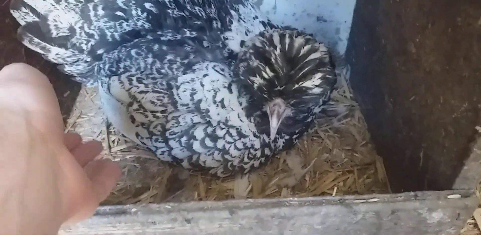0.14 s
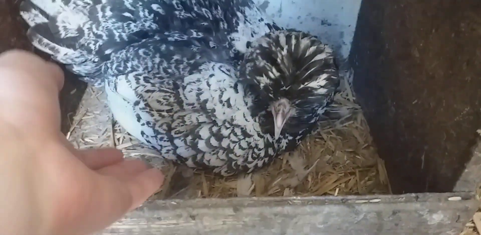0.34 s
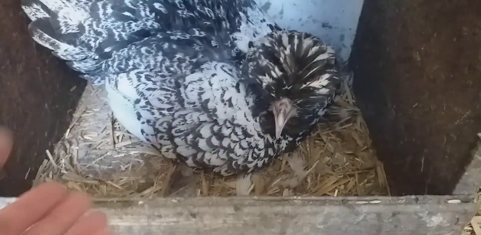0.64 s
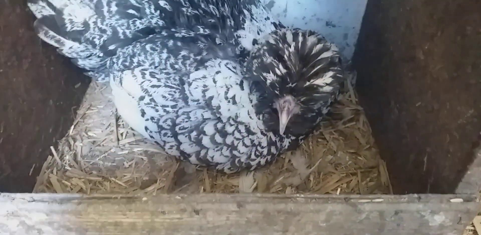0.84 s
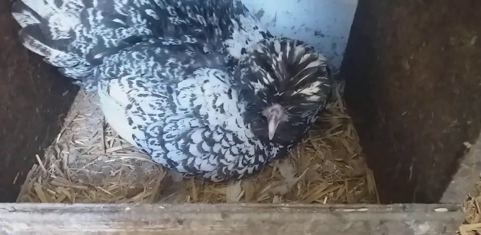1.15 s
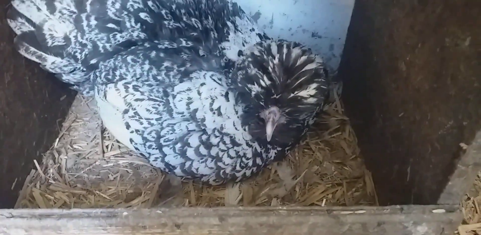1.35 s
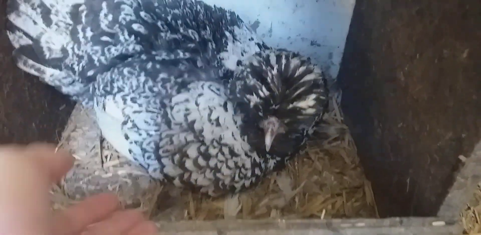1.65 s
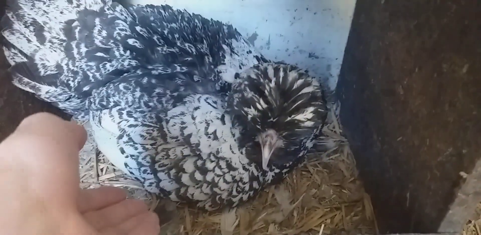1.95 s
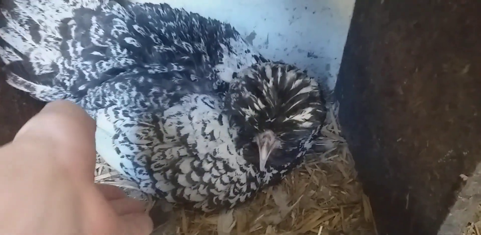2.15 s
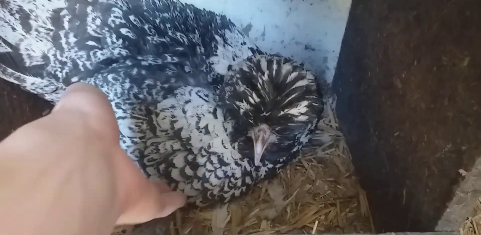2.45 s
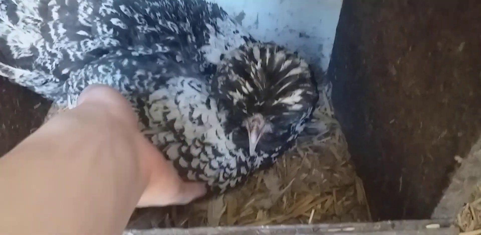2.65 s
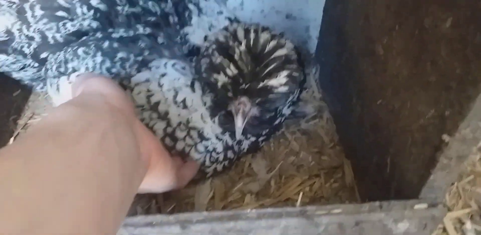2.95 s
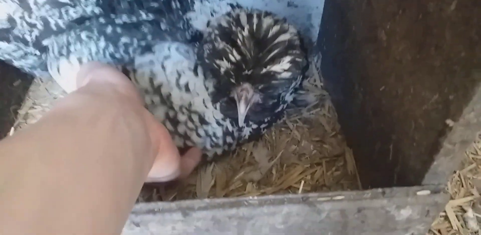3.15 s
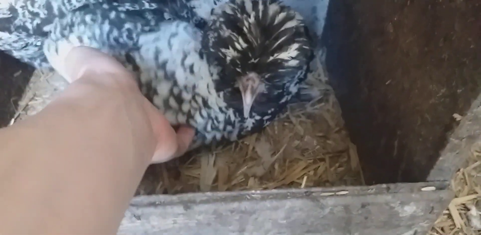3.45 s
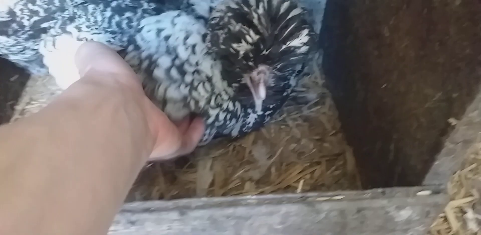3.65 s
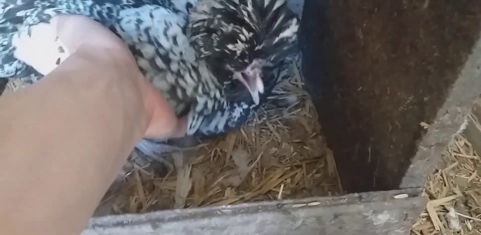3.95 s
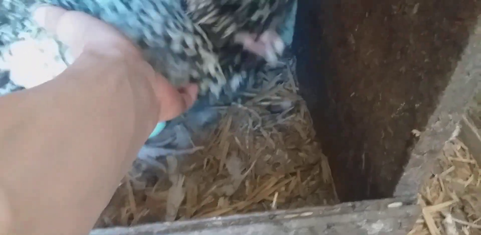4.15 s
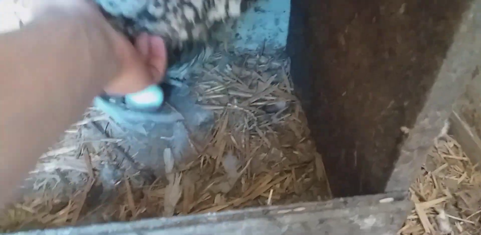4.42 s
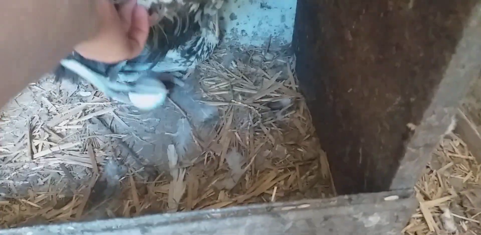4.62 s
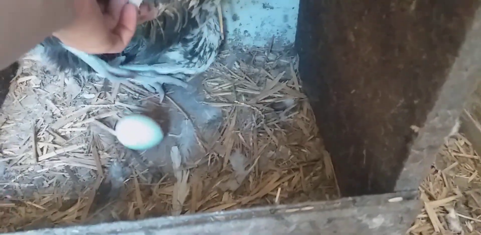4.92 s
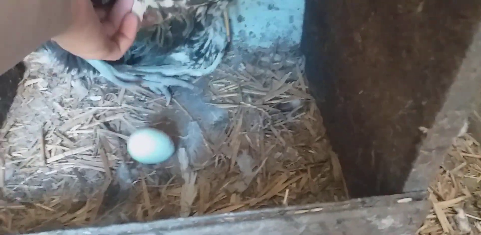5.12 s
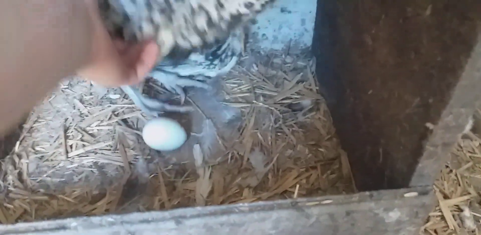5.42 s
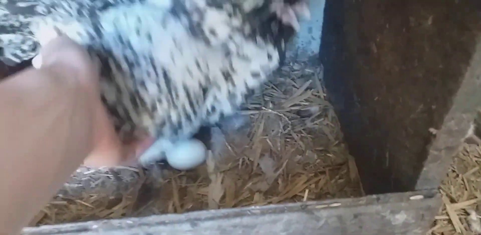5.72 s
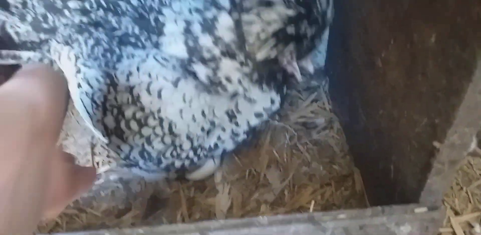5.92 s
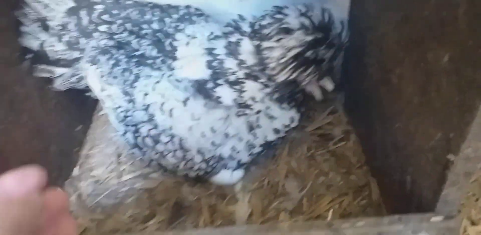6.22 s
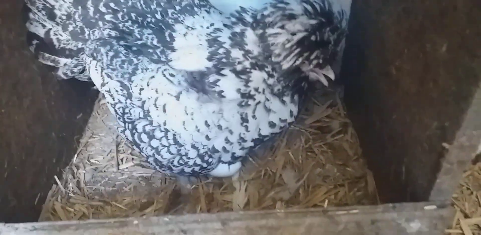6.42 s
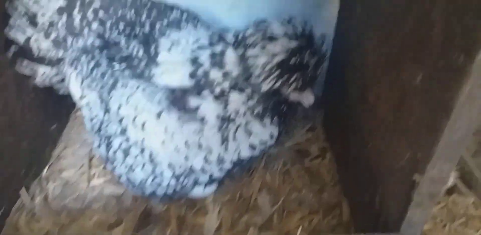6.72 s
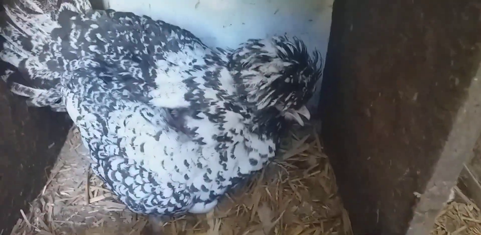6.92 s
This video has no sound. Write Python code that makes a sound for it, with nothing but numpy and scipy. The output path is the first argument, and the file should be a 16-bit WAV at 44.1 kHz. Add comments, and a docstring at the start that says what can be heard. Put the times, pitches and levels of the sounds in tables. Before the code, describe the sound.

A broody hen, an arm's length away in a wooden nest box, gives a thin rising squeal that turns raspy. After a pause she squeals again, louder and quavering, and sinks into a throbbing growl, followed by a long, softer grumble. Further off, a second hen clucks steadily and twice breaks into a two-note squawk. Faint bumps, shuffling and rustling straw lie underneath, and the coop walls echo briefly.

```python
"""Thin squeals from a broody hen, an arm's length away in a wooden nest box, sink into throbbing growls.
Membranes in her syrinx chop the breath into pulses, which the resonances of windpipe and beak filter.
Further off a second hen clucks steadily and twice breaks into a two-note squawk.
The box is bumped, a body shuffles, straw rustles, and the walls of the coop echo briefly."""
import sys
import numpy as np
from scipy import signal
from scipy.fft import rfft, irfft, next_fast_len
from scipy.io import wavfile
from scipy.ndimage import uniform_filter1d

SR = 44100
rng = np.random.default_rng(int(sys.argv[2]) if len(sys.argv) > 2 else 0)


def output_pcm(signal):
    """Save a mono or channel-first signal as 16-bit PCM at the path in sys.argv[1].

    Samples are clipped to [-1, 1] before scaling.
    """
    pcm = np.clip(np.atleast_2d(signal).T, -1, 1) * 32767
    wavfile.write(sys.argv[1], SR, np.round(pcm).astype(np.int16))


N = 312000

# The broody hen's calls, one list a bout. Each row: time in seconds, pitch in Hz, relative level in dB.
BOUTS = [
    [(.2, 1708, -32), (.35, 1883, -24), (.44, 1796, -24.5), (.51, 1563, -13.5), (.58, 1177, -18),
     (.7, 1150, -16)],
    [(1.935, 1623, -22.5), (1.965, 1773, -15), (1.99, 1640, -27), (2.13, 1640, -17.5), (2.37, 1683, -23),
     (2.47, 1630, -14), (2.64, 1630, -13), (2.71, 1300, -9.5), (2.765, 1587, -18.5), (2.87, 1572, -13.5),
     (2.95, 1251, -8.5), (3.45, 1150, -10), (3.48, 943, -15.5), (3.69, 942.3, -15.5), (3.95, 916, -18.5),
     (4.25, 907.4, -16), (4.38, 1079, -19.5), (4.452, 1142, -20.5)],
    [(4.75, 1313, -24.5), (4.805, 1242, -30), (4.82, 891.3, -22), (5.15, 901, -24), (5.35, 943, -17),
     (5.6, 886.2, -22), (6.325, 881.6, -22.5)],
    [(7.004, 882, -26), (7.018, 893, -28), (7.024, 872, -15), (7.07, 860, -52)],
]
# Her breath catches, then bursts through. Each row: time of the burst in seconds, gap depth in dB.
BREATH_CATCHES = [(2.001, 7.5), (2.14, 4.5), (2.203, 13), (2.742, 10.5), (2.777, 4), (2.981, 4),
                  (3.036, 11.5), (3.077, 9), (3.141, 13), (3.179, 5.5), (3.429, 14.5), (3.711, 13.5),
                  (3.811, 7.5), (3.934, 6), (4.365, 8.5), (4.423, 15.5), (4.882, 11.5), (4.948, 15),
                  (5.008, 11), (5.06, 6.5), (5.11, 8.5), (5.469, 10), (5.519, 11.5), (5.579, 10.5),
                  (5.649, 6.5), (5.713, 12.5), (5.779, 10), (6.086, 10), (6.248, 8), (6.302, 7)]
# Her pitch sags for an instant. Each row: time in seconds, share of pitch lost.
PITCH_SAGS = [(2.005, 0.19), (2.148, 0.24), (2.415, 0.11), (2.457, 0.2), (2.542, 0.19), (2.648, 0.3),
              (2.941, .12)]
# Her registers. Each: roughness from 0 to 1, flutter as a share of pitch, subharmonic amplitude.
WHISTLE, QUAVER, RASP = (.04, .025, 0), (.08, .11, 0), (.4, .11, .2)
SCREAM, GROWL, GRUMBLE = (.2, .006, .45), (.55, .035, .47), (.52, .03, .22)
# She slides from register to register. Each row: start in seconds, register.
PHRASES = [(0, WHISTLE), (.48, QUAVER), (.57, RASP), (1.5, WHISTLE), (1.981, QUAVER), (2.25, WHISTLE),
           (2.388, QUAVER), (2.678, RASP), (2.76, WHISTLE), (2.91, RASP), (3.481, SCREAM), (3.691, GROWL),
           (4.6, WHISTLE), (4.81, GRUMBLE)]
# Windpipe and beak resonances for each posture of her neck. Each row: start in seconds, then a list
# of modes, each with frequency in Hz, width in Hz, gain in dB.
NECK_POSTURES = [(0, [(1340, 3000, 1), (3120, 900, 14.5), (4990, 233, 7), (6480, 3500, -8)]),
                 (1.5, [(1110, 640, 1), (2780, 630, 11), (4550, 650, 8.5), (6500, 1050, -10)]),
                 (2.93, [(894, 252, 3), (1450, 180, 2), (2520, 980, 5), (4770, 570, -0.5),
                 (6130, 1140, -9.5)]), (3.482, [(940.4, 400, -11), (2430, 670, -2.5), (3530, 2600, -9.5),
                 (4960, 250, -1), (5910, 160, -1.5)]), (3.699, [(934, 464, -6.5), (1758, 403, 2),
                 (2420, 830, -3.5), (3700, 790, 2.5), (4050, 1440, -0.5), (6300, 8100, -21)]),
                 (4.32, [(1100, 420, 2), (1550, 420, 2.5), (2700, 1000, -12.5), (5200, 580, -8.5)]),
                 (4.599, [(868, 360, -6), (1871, 1004, -0.5), (2549, 890, -2), (3950, 690, -5),
                 (5760, 1900, -14.5)]), (5.56, [(960, 800, -11), (1370, 330, 3), (1584, 410, 2),
                 (3083, 200, -3), (3830, 228, -5.5), (5210, 306, -1)])]
# Yelps over the growl. Each row: time in seconds, level against the growl in dB.
YELP_LEVELS = [(2.95, -35.5), (3.05, -10.5), (3.5, -20), (4.05, -7.5), (4.2, -1.5), (4.5, 3), (5.2, -8.5),
               (6.3, -3.5)]
# The microphone's colouring of her voice. Each row: frequency in Hz, gain in dB.
MICROPHONE_RESPONSE = [(120, -21.5), (250, 5), (480, 4.5), (900, -10), (6000, -9), (8400, -20.5),
                       (10000, -25), (13000, -17.5), (15500, -20.5)]
# The second hen's clucks. Each row: start in seconds, pitch in Hz.
CLUCKS = [(-.03, 382.2), (0.186, 359), (0.389, 353), (0.588, 338), (1.147, 350.3), (1.414, 323),
          (2.46, 327.5), (2.663, 335.2), (2.87, 351.4), (3.055, 372), (3.604, 346), (3.835, 347.7),
          (5.21, 333), (5.411, 331), (5.61, 333.4), (5.8, 329.7), (6.01, 326), (6.518, 328.6)]
# Her squawks. Each row: start, loudest moment, break and end in seconds, high and low note in Hz,
# relative level in dB.
SQUAWKS = [(0.697, 0.742, .838, 1.0, 882.4, 772.6, -8.5), (3.181, 3.25, 3.32, 3.415, 991.6, 762, -8)]
# The filter of her throat. Each row: frequency in Hz, gain in dB.
FAR_THROAT = [(150, -57.5), (250, -17), (525, -15), (913, 4.5), (1100, -8), (2090, -19.5), (2950, -7.5),
              (4550, -25.5), (5600, -27), (7400, -41), (8600, -59.5), (12200, -39.5), (15500, -43.5)]
# Knocks on the box. Each row: time in seconds, peak level in dB, ringing frequency in Hz.
BUMPS = [(0.066, -34, 105), (1.586, -47, 145), (2.718, -33, 178), (6.716, -37, 151.9)]
# The body shifts on the boards. Each row: time in seconds, peak level in dB.
SHUFFLES = [(.95, -42), (2.72, -52.5), (3.6, -52), (4.1, -51.5), (4.45, -41.5), (4.87, -40.5),
            (5.399, -48.5), (5.9, -38), (6.301, -38)]
# The rustle of straw. Each row: time in seconds, level in dB.
STRAW_LEVELS = [(1.8, -79.5), (1.87, -70), (4.55, -56.5), (6.7, -69.5), (6.91, -67), (6.935, -56),
                (6.98, -68)]
# The background air. Each row: frequency in Hz, relative spectral density in dB.
AIR_SPECTRUM = [(18, -20.5), (30, -5), (108, 0.5), (249, -11.5), (9680, -29.5), (11900, -14.5),
                (15500, -39)]

FLUTTER_HZ, YELP_HZ, SLIDE_S = 48.51, 1150, .05
SAG_PUSH_DB = 14  # a sagging note is pushed louder, per share of pitch lost
CLUCK_DB, TIRING_DB_PER_S, CLUCK_SPREAD_DB = -27, 0.45, 3.5
SCOOP, DROOP = .05, .04  # shares of a squawk's pitch
SWELL_DB, FADE_DB_PER_S, LOW_NOTE_DB, HOARSE_S, TORN_DB = 11, 76.5, -6.5, .065, 2
SHUFFLE_RISE_DB_PER_S, SHUFFLE_FALL_DB_PER_S = 50, 132.5
COOP_T60_S, COOP_TREBLE_T60_S, AIR_DB = 0.27, 0.26, -69.5


def broody_hen(t):
    """Source and filter: the syrinx, modulated in pitch and level by a flutter, drives the throat."""
    times, pitches, levels = np.transpose(np.vstack(BOUTS))
    hz, db = np.interp(t, times, pitches), np.interp(t, times, levels)
    phrase = np.searchsorted([s for s, _ in PHRASES], t, side="right") - 1
    registers = np.array([register for _, register in PHRASES])[phrase].T
    rough, flutter, subharmonic = uniform_filter1d(registers, int(SLIDE_S * SR), axis=1)
    beat = np.cumsum(np.pi * FLUTTER_HZ * (1 + 0.159 * band(2, 12.22)) / SR)
    # the flutter pulls the pitch down in short cusps, each of its own size
    cusp = np.abs(np.cos(beat)) ** 3 * np.clip(1 + .25 * band(5, 25), .2, 1.6)
    sag = sum(share * np.exp(-((t - s) / .008) ** 2) for s, share in PITCH_SAGS)
    pulses = syrinx(hz * (1 - flutter * (cusp - .2) - sag), rough, subharmonic)
    voice = neck(colour(pulses, MICROPHONE_RESPONSE), rough, t)
    db = db + breath_catches(t) + 66.4 * flutter * (cusp - 2.0) + SAG_PUSH_DB * sag
    gate = np.clip(sum(edges(t, bout[0][0], bout[-1][0], 0.0028, 0.02) for bout in BOUTS), 0, 1)
    return (voice + yelps(t)) * gate * undb(db)


def syrinx(hz, rough, subharmonic, fundamental_db=0):
    """Self-sustained oscillation: membranes snap shut once a cycle; rough cycles stray and leak air."""
    rough = np.clip(rough, 0, .98)
    jitter = np.exp(.1 * rough * band(20, 300, size=len(hz)))
    half_phase = np.cumsum(np.pi * hz * jitter / SR)
    tone, turn, partial = 0, np.exp(1j * half_phase), 1
    for k in range(1, int(32000 / np.min(hz))):
        partial = partial * turn * np.exp(.1j * k)  # higher partials lag: the snap is not instant
        # period doubling: alternate strong and weak cycles put the odd k between the harmonics
        share = subharmonic if k % 2 else (undb(fundamental_db) if k == 2 else 1)
        tone = tone + share * (k * hz < 32000) * partial.real
    tone = tone * np.sqrt(hz / SR) * 2 / np.sqrt(1 + subharmonic ** 2)
    shimmer = undb(3 * rough * band(30, 250, size=len(hz)))
    breath = rng.standard_normal(len(hz)) * (1 + .5 * np.cos(2 * half_phase))
    return shimmer * (np.sqrt(1 - rough ** 2) * tone + rough ** 2 * breath)


def neck(source, rough, t, blend_s=.03):
    """A time-varying filter: each posture sets its own resonances and blends into the next."""
    out = np.zeros(N)
    ends = [s for s, _ in NECK_POSTURES[1:]] + [t[-1]]
    for (start, modes), end in zip(NECK_POSTURES, ends):
        part = (t >= start) & (t < end + blend_s)
        crossfade = edges(t[part], start, end, blend_s, blend_s)
        out[part] += formants(source[part], modes, rough[part]) * crossfade
    return out


def formants(source, modes, rough):
    """Resonators in parallel: the rougher the voice, the more each one swells and fades alone."""
    out = undb(-24) * source  # a little passes between and above them
    for k, (hz, width, db) in enumerate(modes):
        b, a = signal.iirpeak(hz, hz / width / 1.5, SR)
        ring = signal.lfilter(b, a, signal.lfilter(b, a, source))
        waver_db = 4.5 * rough * band(6, 30, size=len(source))
        out = out + (-1) ** k * undb(db + waver_db) * ring
    return level(out, 0)


def breath_catches(t):
    """Pressure builds and releases: a deeper gap lasts longer and bursts louder. Gives a gain in dB."""
    db = np.zeros(N)
    for s, depth_db in BREATH_CATCHES:
        squeeze = edges(t, s - .015 - 0.0018 * depth_db, s - .003, 0.0099, 0.0028)
        burst = edges(t, s - .003, s + .012, .006, .03)
        db += depth_db * (0.58 * burst - squeeze)
    return db


def yelps(t):
    """Biphonation: the other side of the syrinx adds a nearly pure note in short gliding chirps."""
    glide = np.exp(0.12 * band(15.33, 47.3))
    phase = np.cumsum(2 * np.pi * YELP_HZ * glide / SR)
    chirps = np.clip(band(8.6, 37) + 0.58, 0, 2)
    note = np.cos(phase) + undb(-11) * np.cos(2 * phase)
    return level(note * chirps, 0) * undb(np.interp(t, *np.transpose(YELP_LEVELS)))


def far_hen(t):
    """Source and filter with a fixed throat: clucks and squawks, padded by half a second at each end."""
    out = np.zeros(N + SR)
    age = np.arange(int(.09 * SR)) / SR
    for (s, hz), (bend, push) in zip(CLUCKS, rng.standard_normal((len(CLUCKS), 2))):
        glide = 1 - (.6 + .4 * bend) * (age - .04)
        cluck = syrinx(hz * glide, rough=.5, subharmonic=.1) * edges(age, 0, .05, .03, .02)
        db = CLUCK_DB - TIRING_DB_PER_S * s + CLUCK_SPREAD_DB * push
        at = int((s + .5) * SR)
        out[at:at + len(age)] += level(colour(cluck, FAR_THROAT), db)
    for start, loudest, crack, end, high_hz, low_hz, db in SQUAWKS:
        span = t[int(start * SR):int(end * SR)]
        at = int(start * SR) + SR // 2
        out[at:at + len(span)] += squawk(span, loudest, crack, high_hz, low_hz) * undb(db)
    return out


def squawk(t, loudest, crack, high_hz, low_hz):
    """A register break: a hoarse note scoops up and droops, then jumps to a lower one that does too."""
    arch = [1 - SCOOP, 1, 1 - DROOP]
    high_pitch = high_hz * np.interp(t, [t[0], loudest, crack], arch)
    high_db = np.interp(t, [t[0], loudest], [-SWELL_DB, 0]) - FADE_DB_PER_S * np.clip(t - loudest, 0, 1)
    low_progress = (t - crack) / (t[-1] - crack)
    low_pitch = low_hz * np.interp(low_progress, [0, .75, 1], arch)
    low_db = LOW_NOTE_DB + np.interp(low_progress, [0, .6, 1], [-3, 0, -5])
    hz, db = np.where(t < crack, [high_pitch, high_db], [low_pitch, low_db])
    rough = .2 + .55 * np.exp(-((t - t[0]) / HOARSE_S) ** 2) + .35 * np.exp(-((t - crack) / .015) ** 2)
    voice = colour(syrinx(hz, rough, subharmonic=0.05, fundamental_db=-10), FAR_THROAT)
    return level(voice, 0) * undb(db + TORN_DB * band(11, 60, size=len(t)))


def bumps(t, decay_s=.01):
    """Damped vibration: each knock rings one mode of the boards."""
    return sum(undb(db) * (t > s) * np.sin(2 * np.pi * hz * (t - s)) * np.exp(-np.abs(t - s) / decay_s)
               for s, db, hz in BUMPS)


def shuffle(t):
    """Friction noise: a low, uneven rub swells and dies as the body shifts on the boards."""
    restless_db = 3 * band(3, 15)
    shifts = sum(undb(db - np.where(t < s, SHUFFLE_RISE_DB_PER_S, SHUFFLE_FALL_DB_PER_S) * np.abs(t - s))
                 for s, db in SHUFFLES)
    return band(140, 350) * shifts * undb(restless_db)


def straw(t):
    """Amplitude-modulated noise: a high band flickers quickly and is heard as crackling straw."""
    return band(3700, 5600) * undb(np.interp(t, *np.transpose(STRAW_LEVELS)) + 3.2 * band(18, 120))


def coop(x, onset_s):
    """Reverberation: diffuse echoes of the wooden walls decay exponentially, the treble just sooner."""
    age = np.arange(SR // 2) / SR
    low = band(100, 2600, size=len(age)) * undb(-60 * age / COOP_T60_S)
    high = 1.03 * band(1300, 11000, size=len(age)) * undb(-60 * age / COOP_TREBLE_T60_S)
    tail = (low + high) * np.clip(age / onset_s, 0, 1)
    return signal.fftconvolve(x, tail / np.sqrt(np.sum(tail ** 2)))[:len(x)]


def air():
    """Stationary noise: the air hums faintly, strongest in the bass."""
    return level(colour(rng.standard_normal(N), AIR_SPECTRUM), AIR_DB)


def undb(db):
    """Decibels as an amplitude ratio."""
    return 10 ** (np.asarray(db) / 20)


def level(x, db):
    """Normalisation to an rms level in dB."""
    return x * undb(db) / np.sqrt(np.mean(x ** 2))


def colour(x, points):
    """Zero-phase filtering through points of frequency in Hz and gain in dB."""
    hz, db = np.transpose(points)
    size = next_fast_len(len(x))
    log_hz = np.log(np.arange(size // 2 + 1) * SR / size + 1)
    return irfft(rfft(x, size) * undb(np.interp(log_hz, np.log(hz), db)), size)[:len(x)]


def band(lo_hz, hi_hz, size=N):
    """Band-limited noise of rms 1."""
    bandpass = signal.butter(2, [lo_hz, hi_hz], "bandpass", fs=SR, output="sos")
    return level(signal.sosfilt(bandpass, rng.standard_normal(size)), 0)


def edges(t, start, end, rise_s, fall_s):
    """A trapezoidal envelope: it rises after start and falls after end."""
    return np.clip((t - start) / rise_s, 0, 1) * np.clip(1 - (t - end) / fall_s, 0, 1)


def scene():
    """Superposition: both hens, direct and reverberant, add to the small sounds of the nest."""
    t = np.arange(N) / SR
    near, far = broody_hen(t), far_hen(t)
    far = undb(-3.5) * far + undb(-11.5) * coop(far, onset_s=0.006)
    far = far[SR // 2:SR // 2 + N]  # drop the padding
    near = near + undb(-9.5) * coop(near, onset_s=0.0039)
    return (near + far + bumps(t) + shuffle(t) + straw(t) + air())[None]


def record(dry):
    """Saturation and band limiting: the phone rounds the peaks and cuts the deepest bass and the top."""
    bass_cut = signal.butter(3, 70, "highpass", fs=SR, output="sos")
    top_cut = signal.ellip(12, .2, 90, 15780, fs=SR, output="sos")
    return signal.sosfilt(np.vstack([bass_cut, top_cut]), np.tanh(0.73 * dry) / 0.63)


dry = scene()
out = record(dry)
output_pcm(out)
```